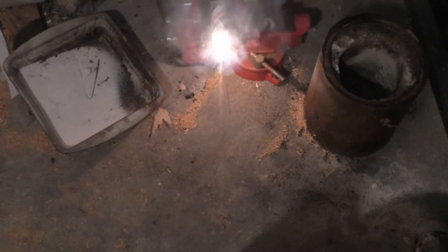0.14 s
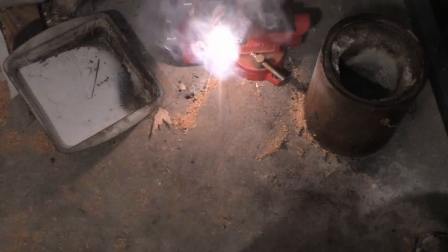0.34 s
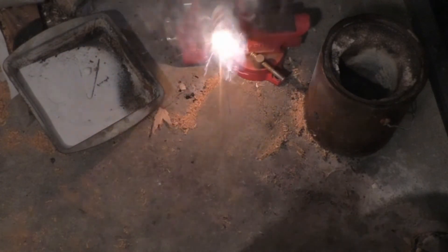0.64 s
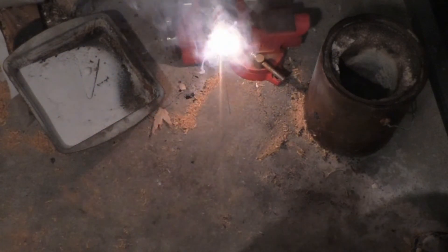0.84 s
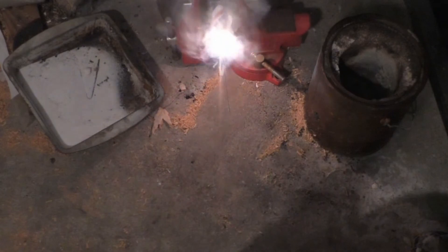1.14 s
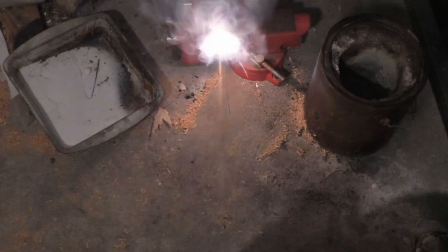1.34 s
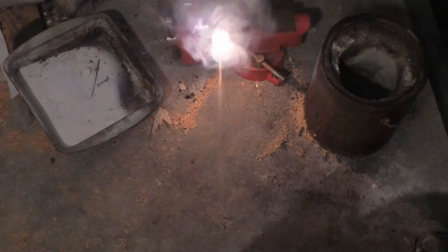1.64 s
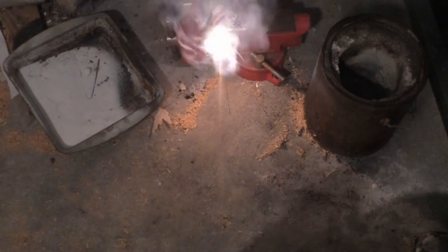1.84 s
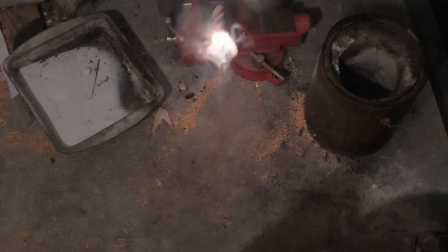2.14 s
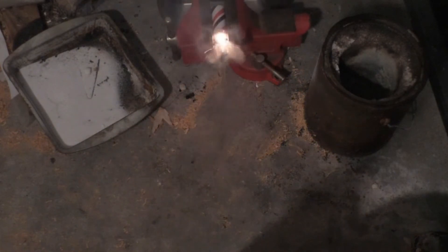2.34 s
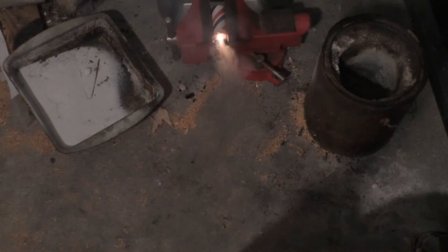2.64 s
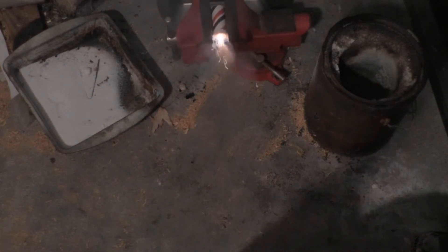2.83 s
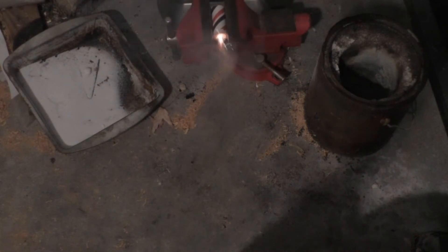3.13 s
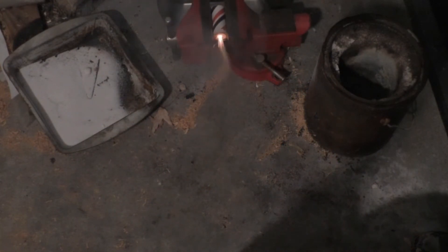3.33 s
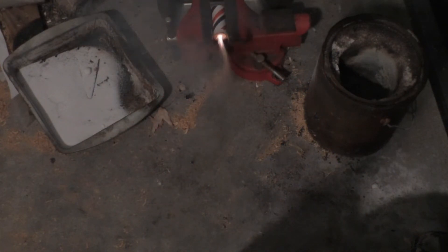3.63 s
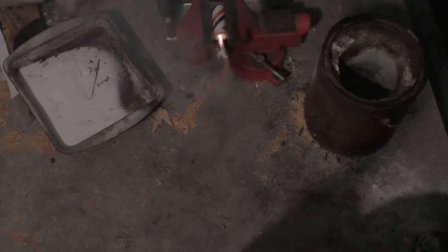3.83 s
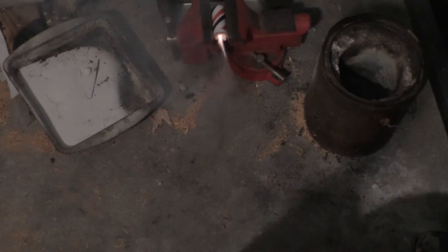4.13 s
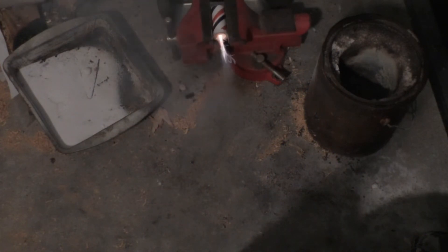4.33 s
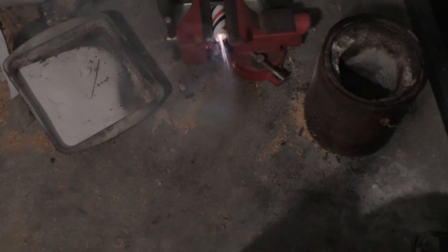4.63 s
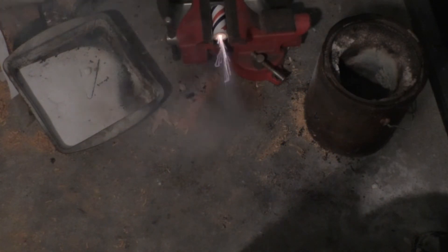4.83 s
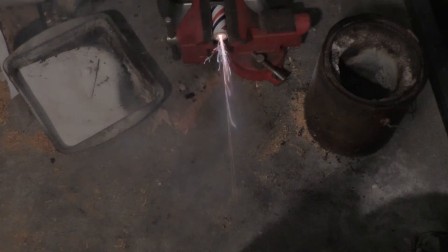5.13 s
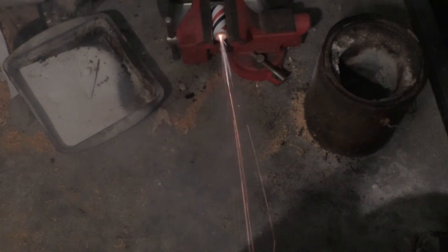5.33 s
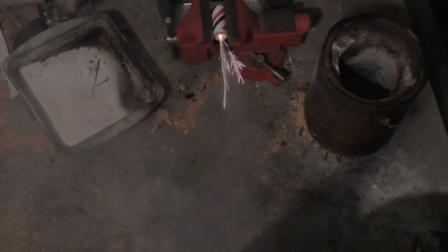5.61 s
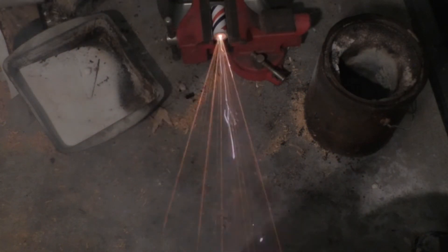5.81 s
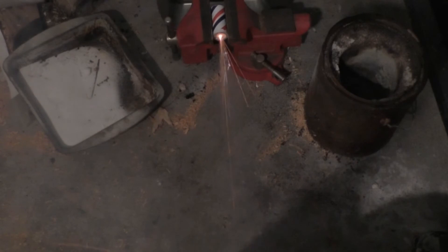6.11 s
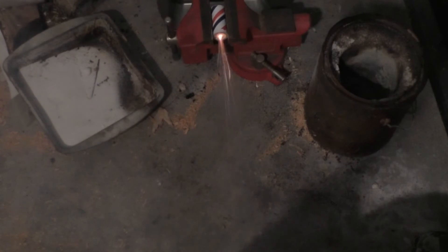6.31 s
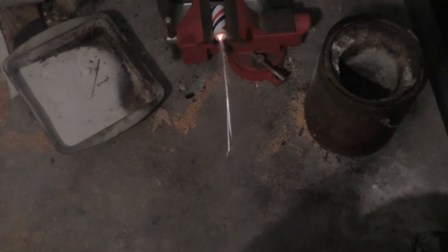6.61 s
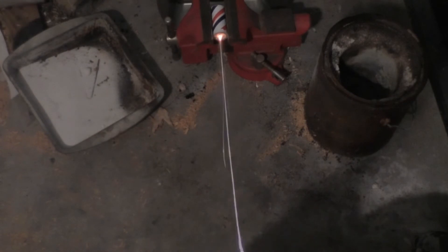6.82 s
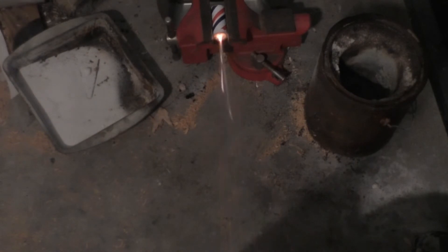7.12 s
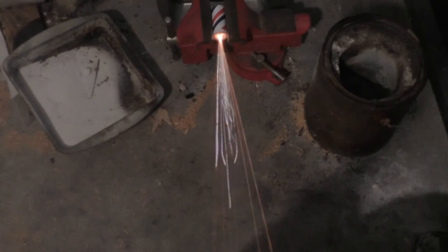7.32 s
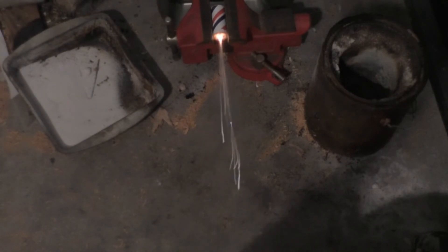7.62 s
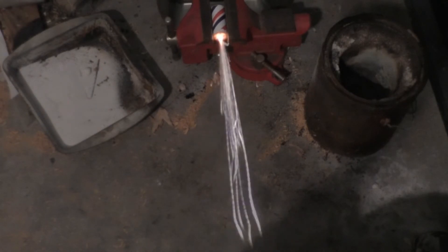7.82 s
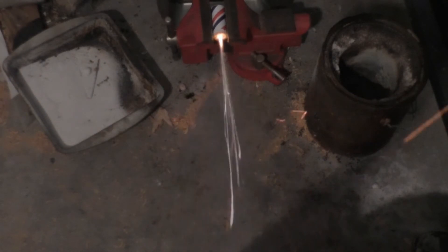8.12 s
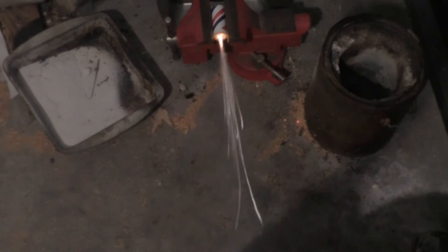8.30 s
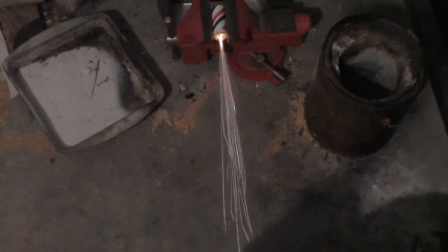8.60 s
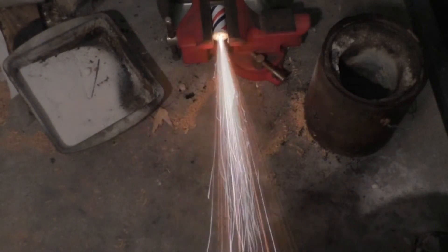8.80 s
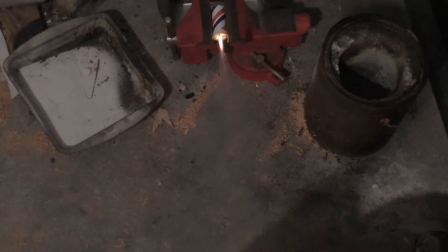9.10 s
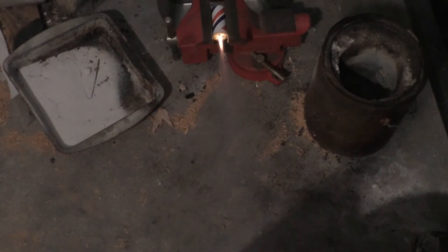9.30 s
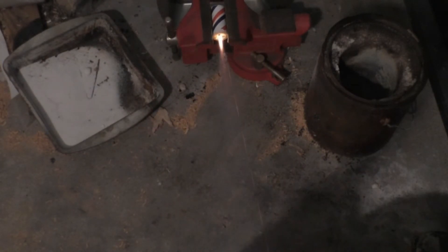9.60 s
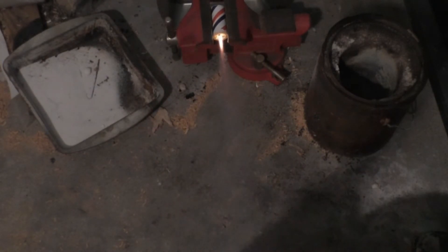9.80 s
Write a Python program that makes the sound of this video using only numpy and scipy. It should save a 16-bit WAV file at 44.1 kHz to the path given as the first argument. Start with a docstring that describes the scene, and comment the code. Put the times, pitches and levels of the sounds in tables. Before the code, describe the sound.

Close stereo sound of a pyrotechnic charge burning in a tube. Rapid irregular puffs and bright snapping sparks come first, each puff starting abruptly and dying quickly. The bursts then merge into a smooth, strong gas hiss with growing low roar. Slag pops out now and then with a blunt crack, the jet sagging momentarily. Short reflections from hard surfaces; very faint distant rumble underneath.

```python
"""A small home-made rocket motor burns in a vice on a concrete floor, heard in stereo: noise under a burn envelope.
First the charge sputters in the open: flares start sharply and die, with sparks cracking as one-sided clicks.
Then it burns into the tube and pressure builds to an even jet. Now and then slag pops out of the nozzle
(short noise crack, low push) and the jet may sag. A faint steady rumble lies under it all."""
import sys
import numpy as np
from scipy import signal
from scipy.fft import rfft, irfft, next_fast_len
from scipy.io import wavfile
from scipy.ndimage import map_coordinates

SR = 44100
rng = np.random.default_rng(int(sys.argv[2]) if len(sys.argv) > 2 else 0)


def to_wav(s):
    """Save 16-bit WAV."""
    ch = np.atleast_2d(s).T  # columns
    pcm = np.round(np.clip(ch, -1, 1) * 32767)  # PCM
    wavfile.write(sys.argv[1], SR, pcm.astype(np.int16))


N = 438794
SIZE = next_fast_len(N + SR // 2)   # FFT length with room for tails
HZ = np.maximum(np.arange(SIZE // 2 + 1) * SR / SIZE, 1)
CUTOFF_HZ = 15830

# Distant rumble and self noise. Each row: frequency in Hz, relative density in dB per Hz.
NIGHT_SPECTRUM = [(12, -35), (20, 3), (125, 7.5), (320, 7.5), (549, 1), (805, 0), (900, -21), (1170, -35),
                  (1980, -120)]
# Colour of the way from jet to each microphone. Each row: frequency in Hz, relative density in dB per Hz.
LEFT_COLOUR = [(30, -26), (60, -27.5), (120, -17), (200, -10.5), (350, -18), (700, -17), (1100, -8.5),
               (1600, -2), (2500, -4), (4500, -8.5), (7000, -14), (9500, -5.5), (12500, -2.5), (16000, -11)]
RIGHT_COLOUR = [(30, -30.8), (60, -27.5), (120, -18), (200, -6.5), (350, -4.5), (700, -16.5), (1100, -8),
                (1600, -0.5), (2500, -3), (4500, -3.5), (7000, -4.5), (9500, -0.7), (12500, -0.5),
                (16000, -6)]
# Narrow peaks and notches in each channel's colour; the left 15590 Hz row lifts the top edge.
# Each row: centre in Hz, width in Hz, height in dB.
LEFT_PEAKS = [(409, 40, 7.0), (473, 47, -3.5), (753, 45, -3.3), (818, 49, -4.5), (1162, 40, 4.3),
              (1270, 44, -3.0), (1335, 46, -3.0), (1399, 48, 3.7), (1658, 58, -8.4), (1937, 38, -5.6),
              (2024, 121, -8.7), (2131, 42, -4.4), (2239, 44, -4.8), (2368, 47, 3.4), (2863, 57, -3.3),
              (3036, 60, -4.4), (3143, 62, 3.8), (3294, 65, -6.1), (3380, 67, 3.2), (3875, 135, 3.6),
              (4091, 81, 3.4), (4263, 42, 7.0), (4823, 48, 6.4), (5081, 50, 3.9), (5189, 103, 7.6),
              (8462, 296, 4.2), (10249, 204, -3.5), (15590, 155, 6.3)]
RIGHT_PEAKS = [(409, 40, 3.3), (689, 41, 4.0), (818, 49, -4.7), (1162, 40, 4.6), (1270, 44, -4.0),
               (1679, 58, -8.2), (1851, 37, -3.5), (1937, 38, -3.5), (2002, 70, -10.6), (2153, 43, -5.7),
               (2390, 47, 4.5), (3057, 61, -2.9), (3273, 65, -4.3), (3897, 38, 6.3), (4005, 40, 4.7),
               (4091, 40, 5.2), (4220, 42, 5.8), (4694, 46, 7.5), (4909, 49, 6.5), (5017, 100, -3.3),
               (5124, 51, 5.7), (5232, 104, 7.8), (5857, 117, 4.3), (6244, 62, 6.9), (6567, 229, 6.0),
               (6890, 68, 4.3), (8462, 169, 3.3), (10249, 204, -3.0)]
# Low modes in both channels. Each row: centre in Hz, width in Hz, height in dB.
LOW_MODES = [(163, 7.6, 4), (184, 13.5, -16.5), (214, 41, 4), (248.6, 24, -11)]
# Phase between channels, weighted per side in paths(). Each row: frequency in Hz, left lead in radians.
PHASE_LEAD = [(0, -1.5), (260, -1.07), (600, 0.63), (2070, 0.91), (2930, 1), (3530, -1.9), (3790, -0.46),
              (4820, 0.96), (5860, -1.9), (6290, -1.7), (6720, 1), (7410, 0.84), (9300, -0.057),
              (15800, -0.57)]
# Scattered sound, separate in each channel. Each row: frequency in Hz, level in dB against direct.
WALL_SCATTER = [(100, -16), (400, -14), (1200, -20), (3500, -12), (7000, -10), (11000, -15), (16000, -20)]
# Slag leaving the nozzle. Each row: start in seconds, thump in dB, crack in dB before its low-pass,
# sag of the jet after it in dB (negative: none).
SLAG_POPS = [(4.412, -41, -40, -2.5), (7.003, -17, -21, 6.5), (7.0624, -19, -29.5, -2),
             (7.2647, -14.5, -21.5, 1.5), (7.686, -22, -30, 1), (7.709, -23.5, -34, 0.5),
             (8.009, -10.5, -19, 4.5), (8.814, -24, -27, -2), (8.821, -27, -26, -1), (8.826, -29, -21, 7.5),
             (9.147, -24, -35, .5)]
# Steady part of the burn. Each row: time in seconds, level in dB.
BURN_LEVEL = [(0, -40.5), (1.6, -41), (2.4, -40), (3.4, -37.5), (4.4, -37), (5.2, -31), (5.6, -25),
              (6, -25), (6.5, -23), (6.75, -23.5), (6.84, -22), (7, -23), (7.7, -24.5), (8.3, -24.5),
              (9.1, -25.5), (9.65, -24.5), (9.95, -25.5)]
# Clear flares. Each row: start in seconds, level in dB before the rise, T60 in seconds.
CLEAR_FLARES = [(0.015, -24.5, 0.091), (0.048, -24.5, 0.14), (0.108, -24, 0.23), (.1437, -24, .08),
                (.1696, -24, .26), (.2035, -27.5, .32), (.2355, -28, 0.22), (.2834, -31.5, 0.59),
                (0.342, -21, 0.12), (.3714, -21.5, 0.062), (.4143, -27.5, 0.13), (.454, -20, 0.16),
                (.486, -25, 0.36), (.5049, -22.5, 0.11), (.5408, -25.5, 0.26), (.586, -21, 0.065),
                (0.649, -21.5, 0.14), (.7263, -32, 0.54), (.7468, -19, 0.084), (0.799, -27, 0.66),
                (.843, -18, .05), (.857, -22, 0.056), (.9239, -28, .27), (.941, -24.5, 0.31),
                (.9946, -16.5, 0.077), (1.0416, -23, 0.6), (1.0756, -27, .13), (1.164, -16.5, 0.058),
                (1.2335, -21.5, .11), (1.2565, -23.5, 0.41), (1.294, -20, 0.084), (1.32, -21.5, 0.18),
                (1.3829, -23.5, 0.3), (1.4515, -24, 0.18), (1.4966, -26.5, 0.29), (1.5397, -23.5, 0.2),
                (1.607, -22, .09), (1.641, -20.5, 0.22), (1.7115, -22.5, 0.32), (1.799, -31, .3),
                (1.8437, -22, 0.26), (1.895, -25, .1), (1.935, -29, 0.42), (2.0043, -18, .12),
                (2.0294, -21.5, 0.43), (2.1528, -19, .14), (2.2409, -25.5, 0.29), (2.314, -23.5, 0.31),
                (2.3726, -26, .7), (2.5023, -26.5, 0.31), (2.587, -22, 0.17), (2.654, -24, 0.39),
                (2.7158, -36, .6), (2.762, -19, 0.096), (2.7995, -22.5, 0.076), (2.8276, -25, .27),
                (2.8755, -24, .11), (2.9816, -26, 0.15), (3.0291, -27, 0.2), (3.1023, -27, .1),
                (3.1648, -30, 0.24), (3.2147, -27, 0.18), (3.27, -26, 0.081), (3.318, -31.5, .6),
                (3.349, -24, 0.084), (3.3943, -25.5, 0.28), (3.4425, -29.5, 0.24), (3.502, -30.5, 0.35),
                (3.5719, -23.5, 0.14), (3.6306, -22, 0.12), (3.6756, -24, 0.29), (3.7435, -25.5, 0.22),
                (3.824, -23.5, 0.3), (3.911, -17, .06), (3.93, -25, 0.21), (3.987, -23, 0.27),
                (4.012, -25, 0.2), (4.109, -23.5, 0.23), (4.193, -23.5, 0.092), (4.2523, -27.5, 0.45),
                (4.289, -25, .15), (4.3541, -23.5, 0.13), (4.41, -23, 0.12), (4.4826, -27, 0.064),
                (4.497, -21.5, .09), (4.5177, -25.5, .19), (4.5716, -27, 0.61), (4.6255, -24, 0.084),
                (4.7307, -23.5, 0.21), (4.7991, -25.5, 0.51), (4.8689, -27, 0.35), (4.904, -20, 0.061),
                (4.967, -26, 0.37), (5.0206, -26.5, 0.21), (5.069, -24.5, 0.27), (5.1303, -25, 0.71),
                (5.2034, -20, .06), (5.224, -21.5, 0.13), (5.2541, -24, 0.078), (5.278, -24, .13),
                (5.298, -23.5, .29), (5.3678, -23.5, .35), (5.4077, -22.5, 0.17), (5.6492, -23, 0.28),
                (5.8727, -25, .6), (6.14, -24, .06), (6.2139, -22, .2)]
# Sparks at random. Each row: time in seconds, mean rate per second.
SPARK_RATE = [(0, 140), (4.6, 400), (5.7, 25)]
# Loudest sparks. Each row: time in seconds, nominal peak in dB at the source.
LOUD_SPARKS = [(0.8604, -6), (1.064, -8), (1.1666, -5), (1.7173, -5), (2.0122, -7), (2.5923, -8),
               (2.8007, -5), (2.8856, -8), (3.4063, -4), (3.7437, -6), (3.7559, -8), (3.8327, -4),
               (3.9339, -5), (4.002, -8), (4.0197, -6), (4.0279, -8), (4.2923, -7), (4.4147, -4),
               (4.5347, -5), (4.7347, -8), (4.9065, -7)]
# Hiss of the far plume. Each row: frequency in Hz, level in dB against the nozzle noise.
PLUME_SPECTRUM = [(100, -16), (500, -12), (1200, -18), (2500, -10), (4500, -6), (8000, -9), (12000, -22),
                  (16000, -24)]
# Level of each range against the burn envelope. Each row: time in seconds, then roar, body, hiss, sizzle, air in dB.
BAND_LEVELS = [(0, -26.5, -9, -4, -4, -10), (1.6, -32, -13, -8, -7.5, -11.5),
               (2.4, -37, -18.5, -10, -7, -11), (3.1, -38, -16, -7, -4.5, -2),
               (3.8, -49, -21.5, -9.5, -7, -3.5), (4.4, -44.5, -20, -4.5, -3, -10.5),
               (5, -35, -19, -3.5, -8, -21), (5.5, -29, -13, -5.5, -13, -14.5),
               (6, -24.5, -10, -3.5, -9.5, -12.5), (6.6, -23.5, -11, -6, -7, -9.5),
               (7.4, -21, -7.5, -5, -5.5, -10), (9.95, -19.5, -6, -4, -4.5, -8.5)]
# Edges in Hz between roar, body, hiss, sizzle and air.
BAND_EDGES_HZ = [900, 2800, 7000, 11300]
# Echo off the vice jaws, nearer as the charge burns in. Each row: time in seconds, lag in ms.
JAW_LAG = [(0, .79), (5, .75)]

NIGHT_RMS_DB = -63.5
SHARED_WALLS_DB, WALLS_T60_S = -11, 0.14
CRACK_LOWPASS_HZ, CRACK_PEAK_S = 2500, 0.0015
BURST_DB, BURST_WIDTH_S, SAG_TO_DEEPEST_S = 2, 0.0057, 0.024
SETTLES_FROM_S, SETTLED_S = 4.6, 8   # sputter turns into an even jet
FLUTTER_DB, JAW_ECHO_GAIN = (2, 0.54), (0.3, 0.097)   # (sputtering, settled); dB per unit of flutter
EXTRA_FLARES, EXTRA_T60_S = 90, 0.11   # at random moments of the sputter
EXTRA_FLARE_DB, EXTRA_SPREAD_DB = 0.5, 1   # against the clear flares just then, plus or minus spread
FLARE_RISE_S = 0.0029


def from_db(db):
    """Amplitude gain of a dB value."""
    return 10 ** (np.asarray(db) / 20)


def rms_one(x):
    """Scale to rms 1."""
    return x / np.sqrt(np.mean(np.abs(x) ** 2) + 1e-20)


def in_time(rows):
    """Columns of a time table, interpolated at every sample."""
    seconds, *columns = np.transpose(rows)
    return [np.interp(np.arange(N) / SR, seconds, column) for column in columns]


def at_hz(points, hz):
    """Spectrum table read on a log-frequency axis."""
    table_hz, values = np.array(points).T
    return np.interp(np.log(hz), np.log(np.maximum(table_hz, 1)), values)


def drift(rate_hz):
    """Slow random wander of rms 1: noise through a double one-pole low-pass."""
    r = np.exp(-2 * np.pi * rate_hz / SR)
    noise = rng.standard_normal(N + SR)
    return rms_one(signal.lfilter([1], [1, -2 * r, r * r], noise)[SR:])   # skip the run-in


def settling(ends):
    """Quantity moving linearly from its sputtering value to its settled one."""
    return in_time(list(zip((SETTLES_FROM_S, SETTLED_S), ends)))[0]


def night():
    """Faint steady rumble: shaped noise, mostly different in each channel."""
    left, right, shared = rfft(rng.standard_normal((3, SIZE))) * from_db(at_hz(NIGHT_SPECTRUM, HZ))
    stereo = np.array([left, right]) + 0.22 * shared
    return from_db(NIGHT_RMS_DB) * rms_one(irfft(stereo, SIZE)[:, :N])


def minimum_phase(db, size):
    """Minimum-phase response of a dB curve (folded cepstrum), so that nothing sounds early."""
    cepstrum = irfft(np.log(from_db(db)), size)
    cepstrum[1:size // 2] *= 2
    cepstrum[size // 2 + 1:] = 0
    impulse = irfft(np.exp(rfft(cepstrum)), size)
    return rfft(impulse, SIZE)


def scatter():
    """Spectrum of a dense decaying swarm of echoes, rms 1."""
    t = np.arange(SR // 3) / SR
    swarm = rng.standard_normal(len(t)) * from_db(-60 * t / WALLS_T60_S)
    return rms_one(rfft(swarm * (t > 0.002), SIZE))


def paths():
    """Response from nozzle to each microphone: colour, narrow peaks and notches, scattered tail."""
    hz = np.maximum(np.arange(4097) * SR / 8192, 1)
    shared = from_db(SHARED_WALLS_DB) * scatter()
    out = []
    for offset_db, lead_weight, colour, peaks in (
            (-0.64, 0.32, LEFT_COLOUR, LEFT_PEAKS),
            (0.18, -0.09, RIGHT_COLOUR, RIGHT_PEAKS)):
        db = at_hz(colour, hz) + offset_db
        for centre_hz, width_hz, height_db in peaks + LOW_MODES:
            db = db + height_db / (1 + (2 * (hz - centre_hz) / width_hz) ** 2)
        phase = np.exp(1j * lead_weight * at_hz(PHASE_LEAD, HZ))
        direct = minimum_phase(db, size=8192) * phase
        own = from_db(at_hz(WALL_SCATTER, HZ)) * scatter()
        out.append(direct * (1 + shared + own))
    return np.array(out)


def pops(path):
    """Slag pops: a crack of a few ms and a soft low push just behind it, along the same path."""
    push, crack = np.zeros((2, N))
    t = np.arange(SR // 100) / SR
    swell = t / CRACK_PEAK_S * np.exp(1 - t / CRACK_PEAK_S)
    for s, thump_db, crack_db, _ in SLAG_POPS:
        i = round(s * SR)
        push[i + SR // 400] = from_db(thump_db)
        crack[i:i + len(t)] = from_db(crack_db) * rms_one(rng.standard_normal(len(t)) * swell)
    low_band = signal.butter(2, [60, 560], "band", fs=SR, output="sos")
    low_pass = signal.butter(2, CRACK_LOWPASS_HZ, fs=SR, output="sos")
    soft = path * signal.sosfreqz(low_band, HZ, fs=SR)[1]
    sharp = path * signal.sosfreqz(low_pass, HZ, fs=SR)[1]
    soft = soft / np.abs(irfft(soft.mean(axis=0), SIZE)).max()   # a unit push peaks at 1 in the channel mean
    sharp = rms_one(sharp)   # unit white noise keeps its power
    return irfft(rfft(push, SIZE) * soft + rfft(crack, SIZE) * sharp, SIZE)[:, :N]


def sag():
    """Jet level change in dB: a burst as slag clears, then pressure drops and rebuilds."""
    db = np.zeros(N)
    for s, _, _, sag_db in SLAG_POPS:
        t = np.arange(N) / SR - s
        late = np.maximum(t - 0.004, 0) / SAG_TO_DEEPEST_S
        db += BURST_DB * np.exp(-((t - 0.002) / BURST_WIDTH_S) ** 2)
        db -= max(sag_db, 0) * late * np.exp(1 - late)
    return db


def add_flare(power, s, level_db, t60_s):
    """One flare jumps up within milliseconds and dies away; cut off after half a second."""
    i = round(s * SR)
    t = np.arange(min(N - i, SR // 2)) / SR
    decay = from_db(level_db - 60 * t / max(t60_s, 0.01))
    power[i:i + len(t)] += (decay * (1 - np.exp(-t / FLARE_RISE_S))) ** 2


def flares():
    """Envelope power of clear flares and of extra random ones, about as strong as the clear ones just then."""
    clear, extra = np.zeros((2, N))
    for row in CLEAR_FLARES:
        add_flare(clear, *row)
    for when, strength in rng.random((EXTRA_FLARES, 2)):
        s = when * SETTLES_FROM_S
        flame_db = 10 * np.log10(clear[round(s * SR)] + 1e-12)
        level_db = flame_db + EXTRA_FLARE_DB + EXTRA_SPREAD_DB * (2 * strength - 1)
        add_flare(extra, s, level_db, EXTRA_T60_S)
    return clear + extra


def burn():
    """Amplitude envelope: steady burn and flares add in power, flutter and sag in dB."""
    flutter_db = settling(FLUTTER_DB) * (0.085 * drift(35) + 0.96 * drift(170))
    steady_power = from_db(2 * in_time(BURN_LEVEL)[0])
    return np.sqrt(steady_power + flares()) * from_db(flutter_db + sag())


def sparks(envelope):
    """Grains burst as tiny shocks, always pressure first; random ones are bigger in a flare."""
    sizes = envelope * from_db(12.5 + 3 * np.minimum(rng.exponential(1, N), 2.2))
    clicks = sizes * (rng.random(N) < in_time(SPARK_RATE)[0] / SR)
    for s, peak_db in LOUD_SPARKS:
        # make up for the share of a click's height above the cut-off
        clicks[round(s * SR)] = from_db(peak_db) * SR / 2 / CUTOFF_HZ
    return signal.lfilter([1], [1, -0.12], clicks)   # steep front, slower fall


def plume(envelope):
    """Spectrum of the far plume's own hiss, opposite in polarity at the two microphones."""
    hiss = rfft(envelope * rng.standard_normal(N), SIZE) * from_db(at_hz(PLUME_SPECTRUM, HZ))
    return hiss * [[1], [-1]]


def jaw_echo(treble):
    """Single delayed copy off the vice jaws; only short waves bounce off the small jaws."""
    late = [np.arange(N) - in_time(JAW_LAG)[0] * SR / 1000]
    return settling(JAW_ECHO_GAIN) * np.array([map_coordinates(c, late, order=3) for c in treble])


def jet(path):
    """Turbulent noise and sparks under the burn envelope, coloured by band as pressure changes."""
    envelope = burn()
    nozzle = envelope * rng.standard_normal(N) + sparks(envelope)
    source = rfft(nozzle, SIZE) + plume(envelope)
    below = [1 / (1 + (HZ / edge) ** 6) for edge in BAND_EDGES_HZ] + [1]
    bands = []
    for under, upto, level_db in zip([0] + below, below, in_time(BAND_LEVELS)):
        band = path * (upto - under) * (HZ < 1.03 * CUTOFF_HZ)
        band = band / np.sqrt(np.mean(np.abs(band.mean(axis=0)) ** 2))
        gain = from_db(level_db + 0.92 * drift(10.2))   # each range also wanders by itself
        bands.append(gain * irfft(source * band, SIZE)[:, :N])
    return sum(bands) + jaw_echo(bands[-2] + bands[-1])


def scene():
    """Night, pops and jet; both motor sounds share one path."""
    path = paths()
    return night() + pops(path) + jet(path)


def record(dry):
    """Round the peaks, then cut the top steeply with a zero-phase low-pass."""
    rounded = 1.2 * np.tanh(dry / 1.2)
    low_pass = signal.ellip(12, 0.25, 40, CUTOFF_HZ, fs=SR, output="sos")
    return signal.sosfiltfilt(low_pass, rounded)


dry = scene()
out = record(dry)
to_wav(out)
```